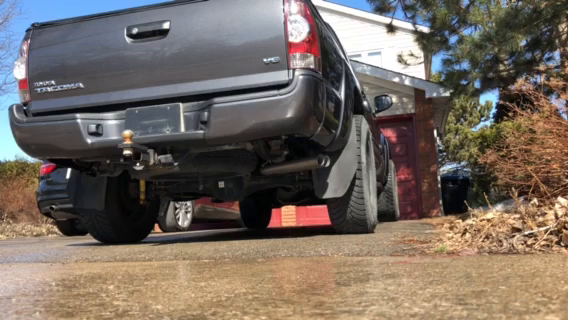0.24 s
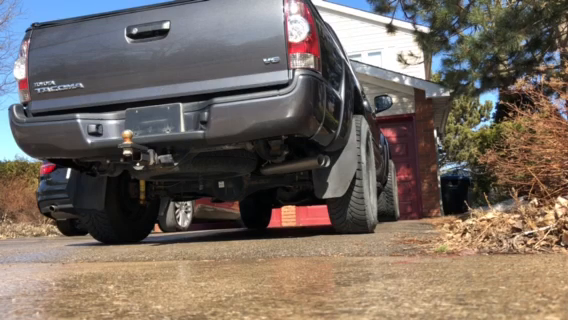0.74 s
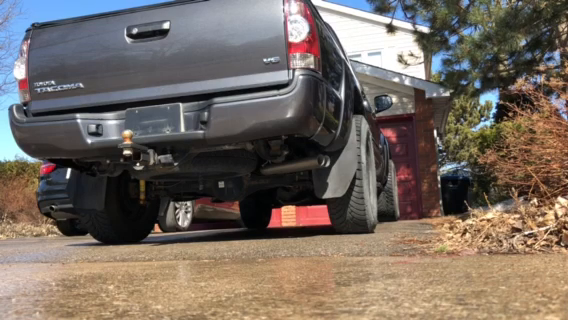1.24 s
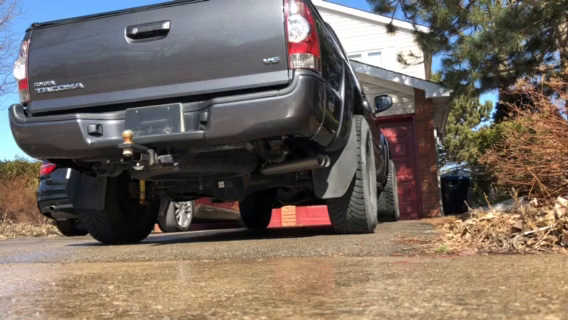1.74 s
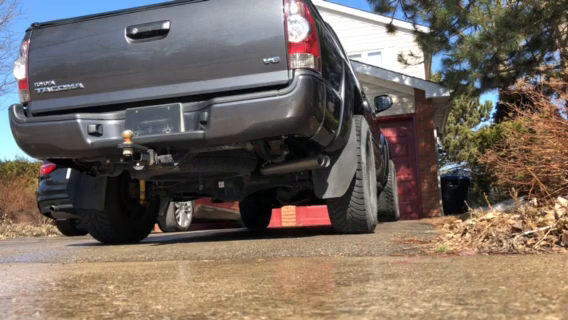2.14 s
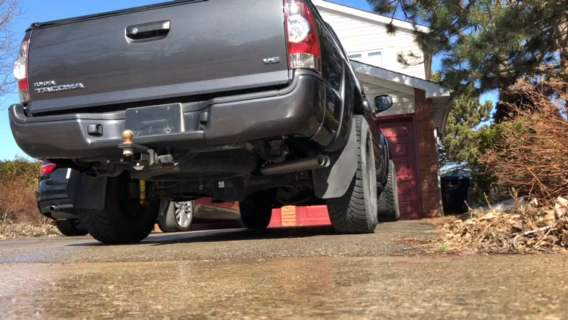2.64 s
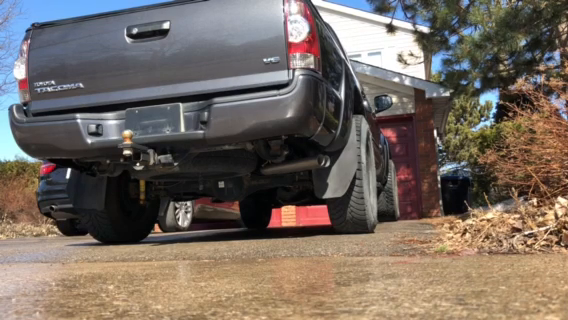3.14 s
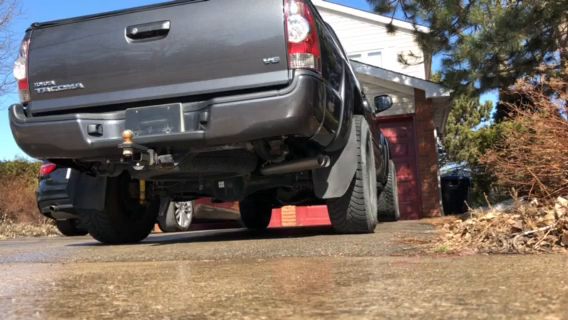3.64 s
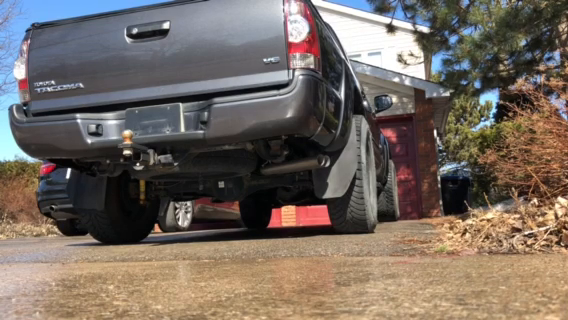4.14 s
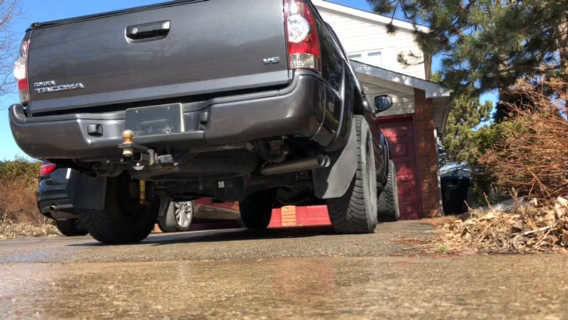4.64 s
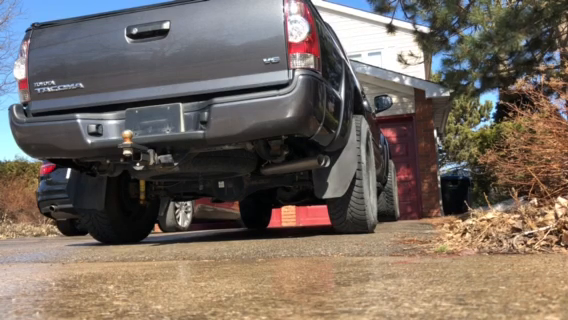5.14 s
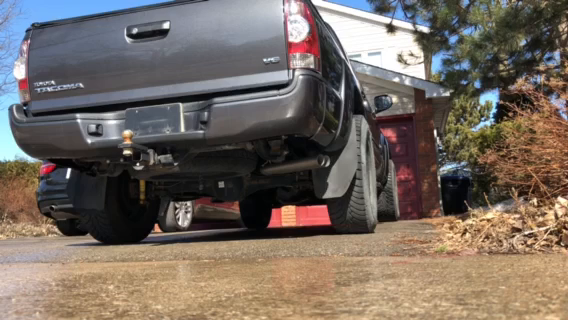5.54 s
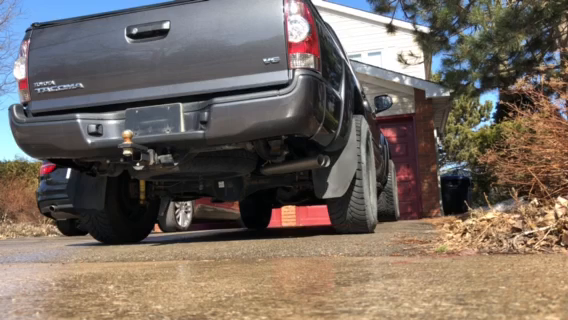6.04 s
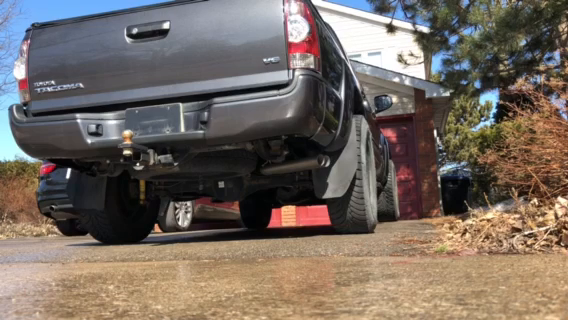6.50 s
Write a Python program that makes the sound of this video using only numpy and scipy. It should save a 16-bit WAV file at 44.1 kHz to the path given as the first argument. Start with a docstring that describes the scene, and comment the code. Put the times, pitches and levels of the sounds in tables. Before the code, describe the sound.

A pickup truck idles fast with a droning, burbling exhaust, cutting out twice and returning quieter with small clicks.

```python
"""Pickup truck at fast idle.

Heard from behind the exhaust, in a driveway; the speed sinks slowly as the engine warms.
The muffler drones and burbles, gas puffs rasp in the tailpipe, the engine bay hisses and ticks.
Twice the sound drops to silence and returns quieter, with small clicks; a sharp one leads the second return."""
import sys
import numpy as np
from scipy import signal
from scipy.fft import rfft, irfft, next_fast_len
from scipy.io import wavfile
from scipy.ndimage import uniform_filter1d, map_coordinates

SR = 44100
rng = np.random.default_rng(int(sys.argv[2]) if len(sys.argv) > 2 else 0)


def unload_audio(sound):
    """Save the sound as a 16-bit wav file, at the path given as the first command line argument."""
    columns = np.transpose(np.atleast_2d(sound))
    # keep every value between -1 and 1, then stretch to whole-number steps
    steps = np.round(np.clip(columns, -1, 1) * 32767)
    wavfile.write(sys.argv[1], SR, steps.astype(np.int16))


N = 298557
SNAP_S, TOP_HZ = 5.0855, 15900

# Engine speed; a throb is one repeat of the puff pattern. Each row: time in seconds, throb rate in Hz.
THROB_RATE = [(0, 24.862), (0.93, 25.124), (1.92, 24.107), (2.76, 23.613), (4.1, 22.027), (5.36, 20.743),
              (6.77, 20.148)]
# The two puffs of a throb. Each row: start in throbs, relative level in dB, decay in throbs.
THROB_PUFFS = [(-.09, -1, 0.17), (0.455, -2.5, .2)]
# Loud puffs. Each row: start in seconds, relative level in dB, pitch in Hz.
LOUD_PUFFS = [(0.038, 5, 1120), (.361, 4, 1000), (.664, 4.5, 700), (.781, 5, 1040), (.799, 8.5, 1000),
              (1.143, 7.5, 1140), (1.241, 6, 900), (1.441, 9.5, 1135), (1.482, 11.5, 1033),
              (1.728, 9, 1150), (1.919, 4, 670), (2.101, 6.5, 1055), (2.311, 6, 990), (2.478, 6.5, 1050),
              (2.521, 8, 930), (2.799, 6.5, 1080), (2.881, 6.5, 1370), (3.184, 7, 1120), (3.228, 8.5, 690),
              (3.334, 13.5, 1030), (3.422, 8, 1086)]
# Cycle of six ticks. Each entry: relative level in dB.
TICK_ACCENTS_DB = [-15, -15, -11, -17.5, -9.5, -19]
# Audible stretches. Each row: start and end in seconds, drone gain in dB, its slope in dB/s,
# noise gain in dB, its slope in dB/s.
AUDIBLE_SPANS = [(0, 3.804, -30.5, -0.48, -39, 0.15), (4.225, 4.805, -45.5, 0.3, -48.5, 2),
                 (5.097, 6.8, -49, 7, -49, 3.5)]
# Small clicks. Each row: start in seconds, gain in dB, ring gain relative to that in dB.
SMALL_CLICKS = [(4.237, -36.5, -49.5), (5.074, -27, -45), (5.097, -43, -40), (5.1086, -35.5, -42),
                (5.5693, -38, -23), (5.5838, -39, -14)]

# Resonances. Each row: centre in Hz, width in Hz, relative gain in dB.
TAILPIPE_MODES = [(698, 47, -2.5), (806, 49, 1), (910, 52, 1), (1094, 78, 2), (1230, 38, 0),
                  (1376, 77, -4.5), (1646, 78, -7), (1843, 41, -4)]
MUFFLER_MODES = [(114.5, 41.7, 4.5), (235, 39.7, 5.5), (356.4, 38, -0.5), (488.5, 80, -1.5),
                 (619.6, 80, -0.5)]
TICK_MODES = [(7850, 300, 2), (9370, 700, -1), (11000, 1100, -3)]
CLICK_MODES = [(5750, 600, 5.5), (8900, 1300, -2), (14800, 2000, -10)]

# Spectral shapes. Each row: frequency in Hz, relative level in dB.
EXHAUST_BOOM_SHAPE = [(40, -29), (50, -29), (62, -45), (82, -9.5), (97, -10.5), (104, -10), (119, 0),
                      (127, -5.5), (141, -6), (153, -19.5), (172, -11.5), (186, -19.5), (224, -10.5),
                      (245, -18), (320, -31.5)]
EXHAUST_RUMBLE_SHAPE = [(18, -26), (32, -7), (45, 2.5), (70, -1.5), (130, -19.5), (400, -59.5)]
SPIT_SHAPE = [(900, -21), (1700, 3.5), (2300, -4.5), (3200, -12.5), (4500, -19.5), (8000, -35)]
BAY_HISS_SHAPE = [(300, -41), (1500, 0.5), (2300, 1), (3500, -4), (6000, -8), (9000, -15), (11700, -19),
                  (12500, -18.5), (15800, -25)]
CLICK_SHAPE = [(500, -32), (2500, 5), (5400, 4.5), (8000, -4.5), (10000, -3), (13000, 0.5), (16000, 3)]


def amp(db):
    """Decibels to gain."""
    return 10 ** (np.asarray(db) / 20)


def unit(x):
    """Scale to rms 1."""
    return x / np.sqrt(np.mean(x ** 2) + 1e-20)


def wobble(rate_hz):
    """Smooth random curve."""
    knots = rng.standard_normal(int(N * rate_hz / SR) + 4)
    return map_coordinates(knots, [np.arange(N) * rate_hz / SR])


def filtered(x, response):
    """Apply a complex frequency response."""
    size = next_fast_len(N + SR // 2)
    return irfft(rfft(x, size) * response(np.fft.rfftfreq(size, 1 / SR)), size)[:N]


def coloured(x, shape):
    """Apply a spectral shape, interpolated in log frequency."""
    hz, db = np.transpose(shape)
    return filtered(x, lambda f: amp(np.interp(np.log(f + 1), np.log(hz), db)))


def resonances(modes, f):
    """Causal response of modes with alternating signs."""
    return sum((-1) ** k * amp(db) * 1j * f * width / (hz * hz - f * f + 1j * f * width)
               for k, (hz, width, db) in enumerate(modes))


def burst(age, rise, fall):
    """Quick swell, exponential decay."""
    return (1 - np.exp(-(age / rise) ** 2)) * np.exp(-age / fall)


def puff_train(throbs, start, rise, fall, scatter_db, db=0):
    """One burst of random strength per throb; times in throbs."""
    count, age = np.divmod(throbs - start + 1, 1)
    strength = amp(db + scatter_db * rng.standard_normal(256))[count.astype(int)]
    return strength * burst(age, rise, fall)


def gas_flow(throbs, rise_throbs=0.041, scatter_db=1.1):
    """Exhaust flow, two puffs per throb."""
    return unit(sum(puff_train(throbs, start, rise_throbs, fall, scatter_db, db)
                    for start, db, fall in THROB_PUFFS))


def drone(throbs, rate_hz, waver_db=1.0, smear_turns=0.13, centre_order=4.5):
    """Throb harmonics; as the speed sinks, higher ones slide into the muffler's boom."""
    hz, db = np.transpose(EXHAUST_BOOM_SHAPE)
    tone = np.zeros(N)
    for order in range(2, 14):
        level_db = np.interp(np.log(order * rate_hz), np.log(hz), db) + waver_db * wobble(7)
        # The long pipe delays each harmonic differently: pulses smear into flutter.
        shift_turns = smear_turns * (order - centre_order) ** 2
        tone += amp(level_db) * np.cos(2 * np.pi * (order * throbs + shift_turns))
    return np.sqrt(2) * tone


def rasp(flow, steady=0.2, low_hz=450, high_hz=1850):
    """Each puff's turbulence rings the tailpipe."""
    gas = (flow + steady) * rng.standard_normal(N)
    band = lambda f: 1 / np.sqrt((1 + (f / high_hz) ** 16) * (1 + (low_hz / (f + 1)) ** 4))
    return unit(filtered(gas, lambda f: resonances(TAILPIPE_MODES, f) * band(f)))


def putts(throbs, pitch_hz=1050, log_spread=0.58, usual_db=-2, scatter_db=2,
          rise_s=0.0024, fall_s=0.0055, grit_db=-4, rough_rad=0.25, high_hz=2000):
    """Each puff rings briefly at its own pitch, with a gritty edge; a few pop out loudly."""
    t = np.arange(SR // 25) / SR
    layers = np.zeros((2, N + SR))
    start_throbs = np.add.outer(np.arange(int(throbs[-1])), [row[0] for row in THROB_PUFFS])
    starts_s = np.searchsorted(throbs, start_throbs.ravel()) / SR
    draws = rng.standard_normal((len(starts_s), 2))
    usual = [(s, usual_db + scatter_db * loud, pitch_hz * np.exp(log_spread * np.tanh(high / 2)))
             for s, (loud, high) in zip(starts_s, draws)]
    for start_s, db, hz in usual + LOUD_PUFFS:
        noise = rng.standard_normal(len(t))
        phase = 2 * np.pi * hz * t + rough_rad * np.cumsum(noise) / np.sqrt(SR * fall_s)
        i = round(start_s * SR)
        layers[:, i:i + len(t)] += amp(db) * burst(t, rise_s, fall_s) * [np.sin(phase), noise]
    tone, grit = layers[:, :N]
    pipe = lambda f: resonances(TAILPIPE_MODES, f) / (1 + (f / high_hz) ** 8)
    return tone + amp(grit_db) * np.std(tone) * unit(filtered(grit, pipe))


def burble(flow, steady=2.3, low_hz=45, high_hz=800):
    """Turbulent gas booms in the muffler's chambers."""
    gas = (flow + steady) * rng.standard_normal(N)
    band = lambda f: (f / (f + low_hz)) / np.sqrt(1 + (f / high_hz) ** 6)
    return unit(filtered(gas, lambda f: resonances(MUFFLER_MODES, f) * band(f)))


def sputter(throbs):
    """A bright spit on each throb's stronger puff."""
    spits = puff_train(throbs, start=-0.05, rise=0.035, fall=0.12, scatter_db=4)
    return unit(coloured(spits * rng.standard_normal(N), SPIT_SHAPE))


def engine_bay(flow, pulsing=0.12):
    """Fan and belt hiss, pulsing slightly."""
    hiss = (1 + pulsing * flow) * rng.standard_normal(N)
    return underbody(unit(coloured(hiss, BAY_HISS_SHAPE)))


def underbody(x, t60_s=0.14, wet=0.3):
    """Short reflections between ground and chassis ripple the spectrum."""
    t = np.arange(SR // 20) / SR
    tail = rng.standard_normal(len(t)) * amp(-60 * t / t60_s)
    return unit(x + wet * signal.fftconvolve(x, tail / np.linalg.norm(tail))[:N])


def rumble():
    """Low exhaust noise."""
    return unit(coloured(rng.standard_normal(N), EXHAUST_RUMBLE_SHAPE))


def ticking(throbs, start_throbs=0.3, rise_throbs=0.061, fall_throbs=0.37, scatter_db=2.5,
            low_hz=6500, high_hz=12000):
    """Fine metallic ticks in the engine bay, two per throb, in a cycle of accents."""
    count, part = np.divmod(2 * (throbs - start_throbs + 1), 1)
    db = np.take(TICK_ACCENTS_DB, count.astype(int) - 2, mode="wrap") + scatter_db * wobble(7.2)
    ticks = amp(db) * burst(part / 2, rise_throbs, fall_throbs) * rng.standard_normal(N)
    band = lambda f: 1 / (1 + (f / high_hz) ** 12) / (1 + (low_hz / (f + 1)) ** 8)
    return unit(filtered(ticks, lambda f: resonances(TICK_MODES, f) * band(f)))


def pipe_ring(hz=1095, width_hz=90):
    """The tailpipe's main resonance sings on between puffs."""
    return unit(filtered(rng.standard_normal(N), lambda f: resonances([(hz, width_hz, 0)], f) ** 2))


def span_gains():
    """Drone and noise gains: abrupt start, steady drift, abrupt stop."""
    t, gains = np.arange(N) / SR, np.zeros((2, N))
    for start_s, end_s, drone_db, drone_slope, noise_db, noise_slope in AUDIBLE_SPANS:
        age_s = t - start_s
        db = [drone_db + drone_slope * age_s, noise_db + noise_slope * age_s]
        gains += (age_s >= 0) * (t < end_s) * amp(db)
    return uniform_filter1d(gains, size=24, axis=1)


def crack(start_s, length_s=0.000709, from_hz=17000):
    """Dry click: a very fast downward sweep."""
    u = np.clip((np.arange(N) / SR - start_s) / length_s, 0, 1)
    return np.sqrt(np.abs(np.sin(np.pi * u))) * np.sin(2 * np.pi * from_hz * length_s * (u - u * u / 2))


def clicks(tail_t60_s=0.081, low_hz=3000, strike_db=24):
    """Small thin clicks, some with a bright ping and a short fizzy ring."""
    t = np.arange(N) / SR
    hits, strikes, tails = np.zeros((3, N))
    for start_s, db, ring_db in SMALL_CLICKS:
        hit = amp(db) * crack(start_s)
        hits += hit
        strikes += amp(ring_db + strike_db) * hit
        tails += (t > start_s) * amp(db + ring_db - 60 * np.abs(t - start_s) / tail_t60_s)
    body = lambda f: resonances(CLICK_MODES, f)
    ring = filtered(strikes, body) + tails * unit(filtered(rng.standard_normal(N), body))
    return filtered(coloured(hits, CLICK_SHAPE) + ring, lambda f: f * f / (f * f + low_hz ** 2))


def snap(lead_s=0.0112, ping_hz=3050, swell_s=0.002, chirp_hz=2600, glide_s=0.00079, fade_s=0.0017,
         body_hz=1700, body_s=0.00028):
    """A ping swells over a faint low rustle into a sharp click, then a falling chirp."""
    t = np.arange(N) / SR - SNAP_S
    gap_s = np.abs(t)
    ping = (t < 0) * (t > -lead_s) * np.exp(-gap_s / swell_s) * np.sin(2 * np.pi * ping_hz * t)
    chirp_turns = chirp_hz * glide_s * np.log1p(gap_s / glide_s)
    chirp = (t > 0) * np.exp(-gap_s / fade_s) * np.sin(2 * np.pi * chirp_turns)
    body = np.exp(-gap_s / body_s) * np.sin(2 * np.pi * body_hz * t)
    low_noise = unit(filtered(rng.standard_normal(N), lambda f: 1 / (1 + (f / body_hz) ** 4)))
    rustle = (gap_s < lead_s) * low_noise
    click = coloured(crack(SNAP_S), CLICK_SHAPE)
    return amp(-7) * click + amp(-21) * (ping + body) + amp(-18) * chirp + amp(-53) * rustle


def scene():
    """Idling truck, gated into three stretches, plus clicks."""
    rate_hz = np.interp(np.arange(N) / SR, *np.transpose(THROB_RATE))
    throbs = np.cumsum(rate_hz) / SR
    drone_gain, noise_gain = span_gains()
    flow = gas_flow(throbs)
    exhaust = amp(-2) * rasp(flow) + amp(7) * putts(throbs) + burble(flow) + amp(-22) * sputter(throbs)
    noise = exhaust + amp(-16.5) * engine_bay(flow) + amp(-21) * rumble()
    # Exponents below 1: ticks and pipe ring fade less than the noise.
    share = np.abs(noise_gain) / noise_gain.max()
    metal = amp(-69) * share ** 0.94 * ticking(throbs) + amp(-50) * share ** 0.74 * pipe_ring()
    truck = drone_gain * drone(throbs, rate_hz) + noise_gain * noise + metal
    return (truck + clicks() + snap())[None]


def record(dry):
    """Steep low-pass at TOP_HZ."""
    return filtered(dry[0], lambda hz: np.clip((TOP_HZ - hz) / 600 + 0.5, 0, 1))[None]


dry = scene()
out = record(dry)
unload_audio(out)
```